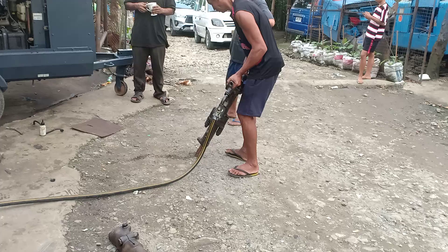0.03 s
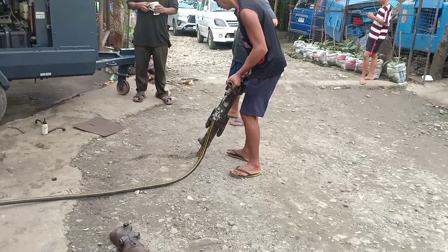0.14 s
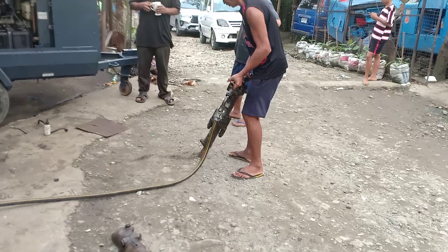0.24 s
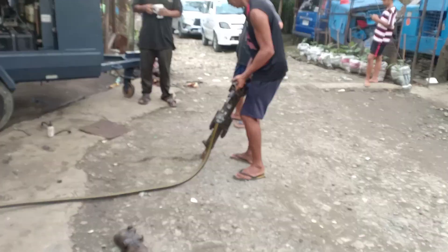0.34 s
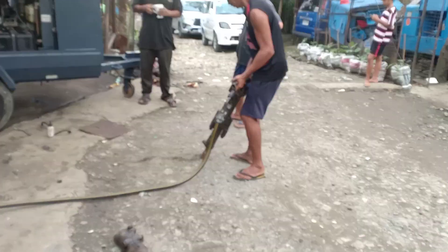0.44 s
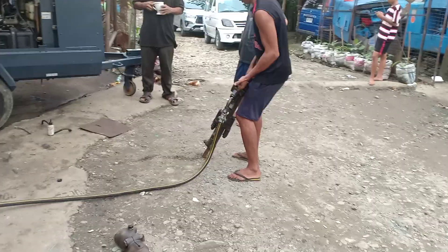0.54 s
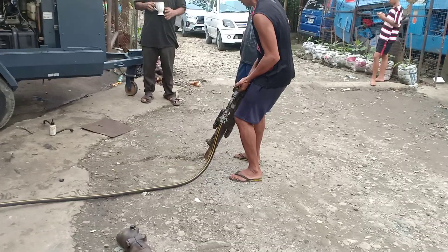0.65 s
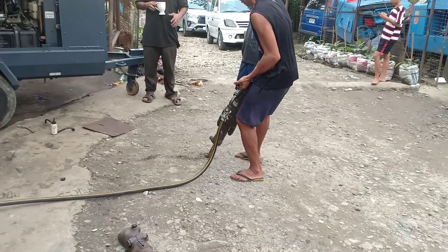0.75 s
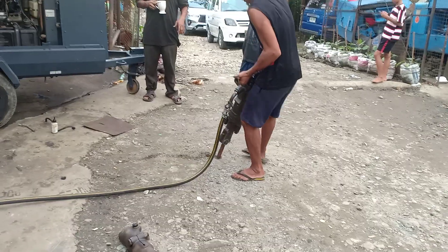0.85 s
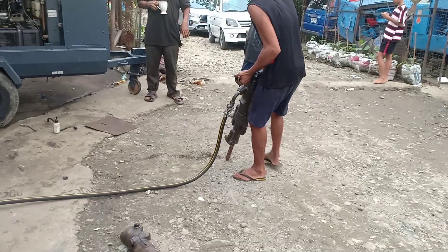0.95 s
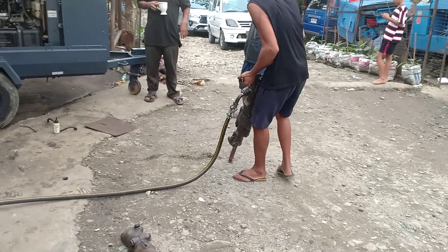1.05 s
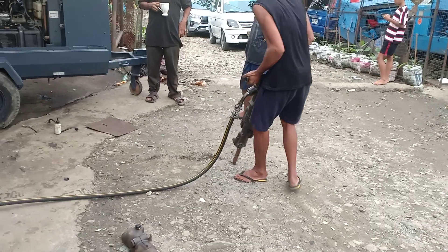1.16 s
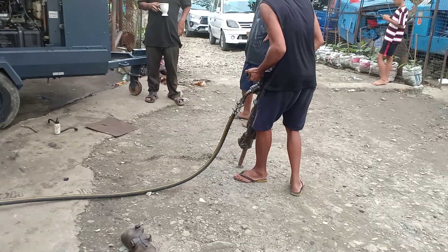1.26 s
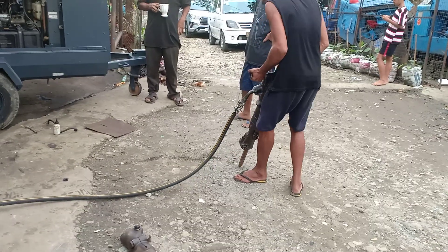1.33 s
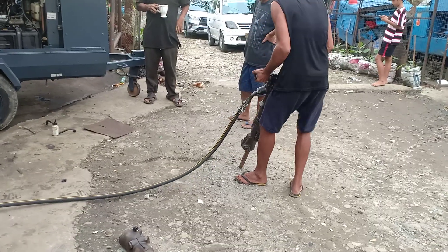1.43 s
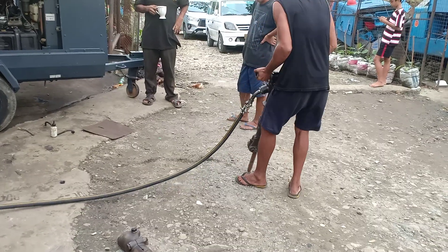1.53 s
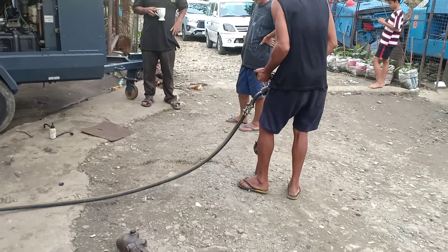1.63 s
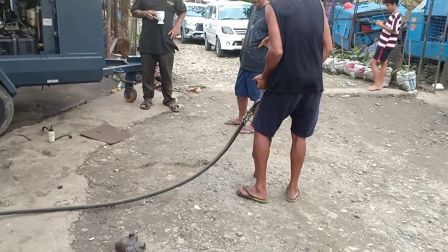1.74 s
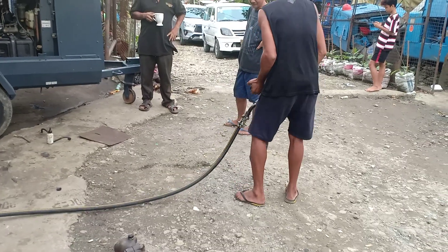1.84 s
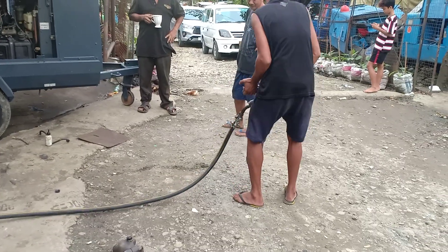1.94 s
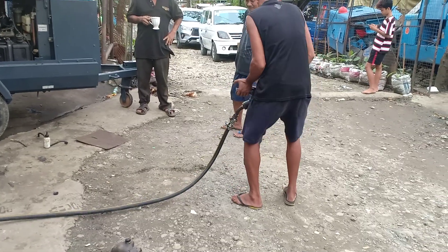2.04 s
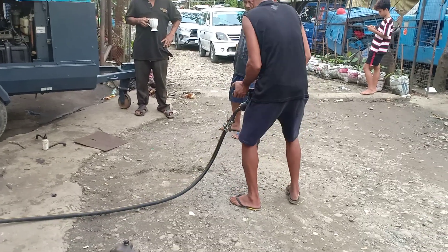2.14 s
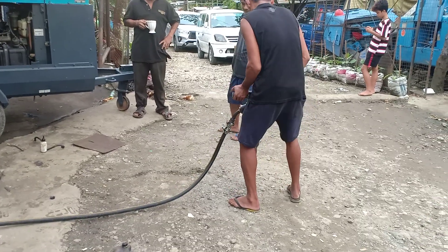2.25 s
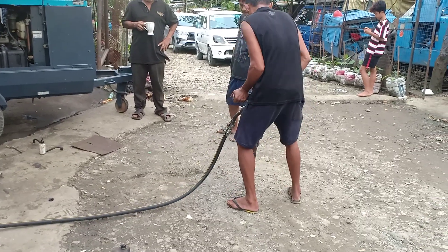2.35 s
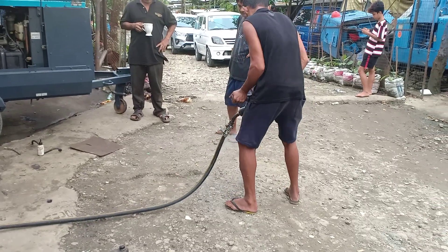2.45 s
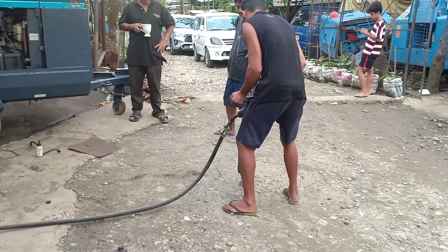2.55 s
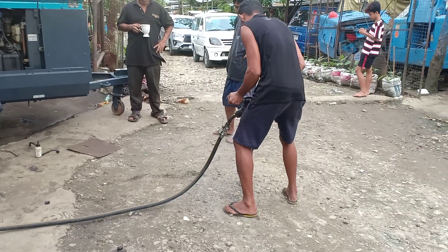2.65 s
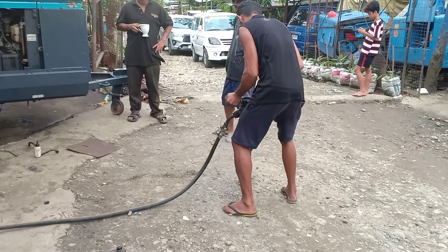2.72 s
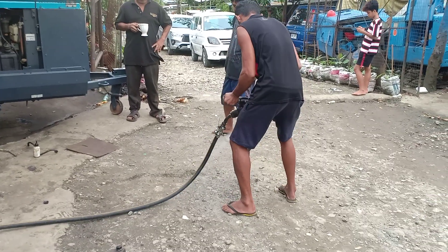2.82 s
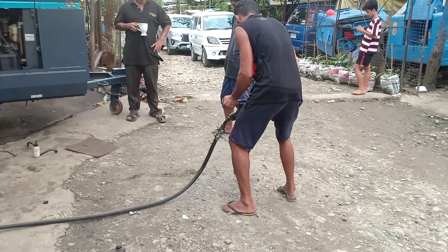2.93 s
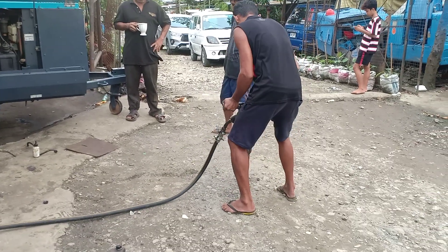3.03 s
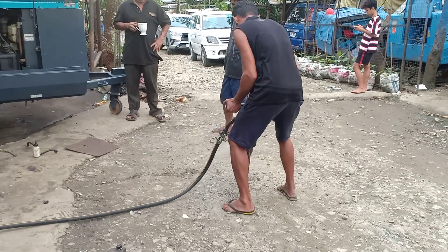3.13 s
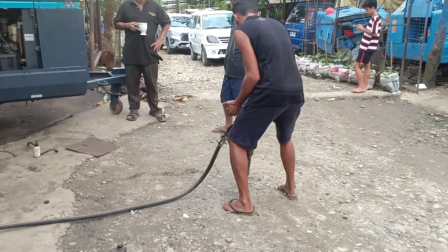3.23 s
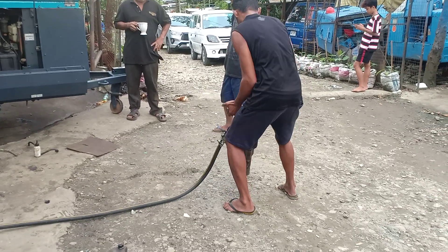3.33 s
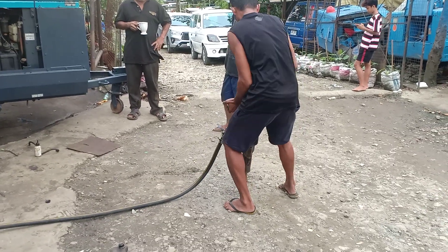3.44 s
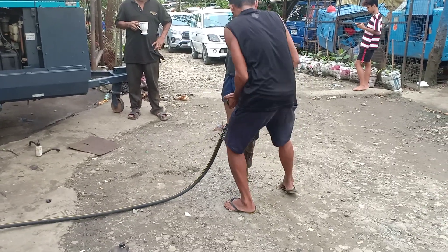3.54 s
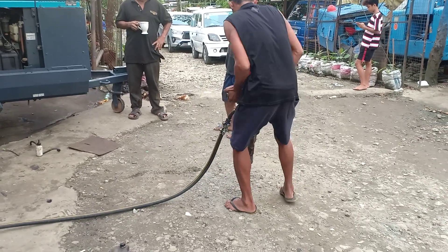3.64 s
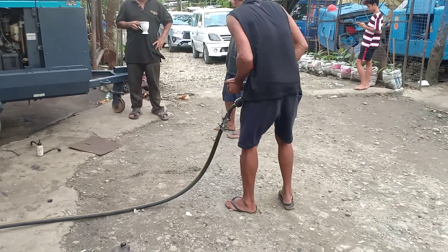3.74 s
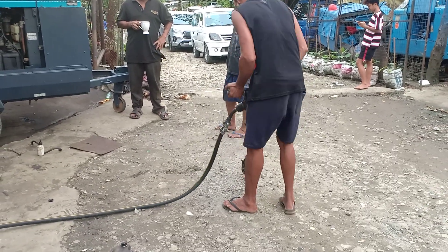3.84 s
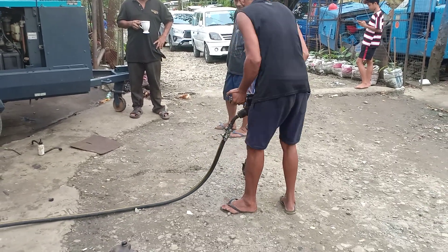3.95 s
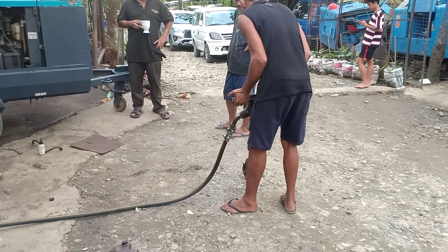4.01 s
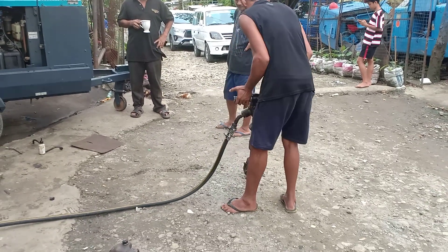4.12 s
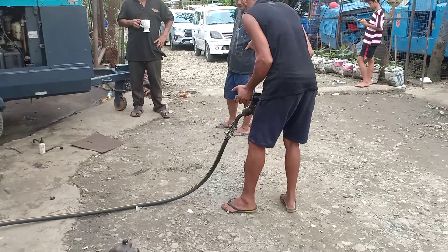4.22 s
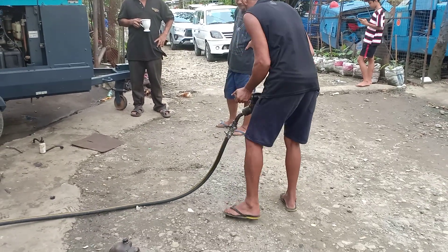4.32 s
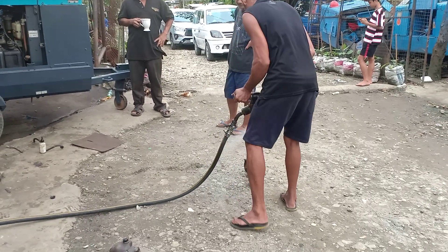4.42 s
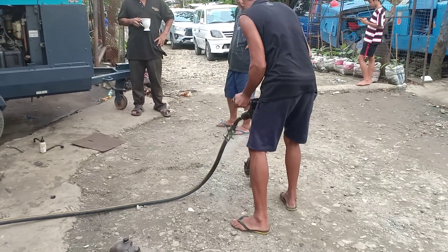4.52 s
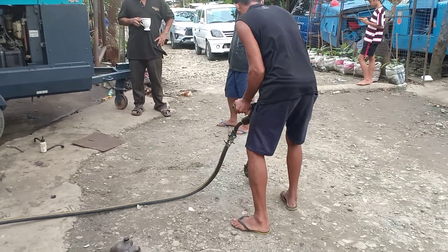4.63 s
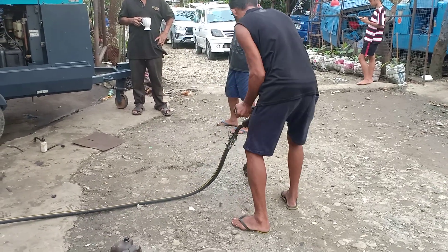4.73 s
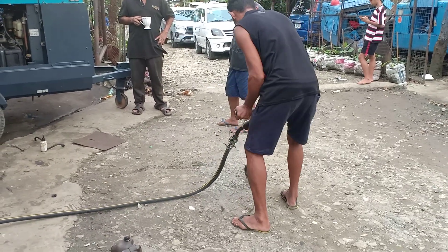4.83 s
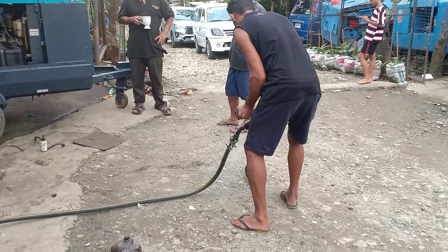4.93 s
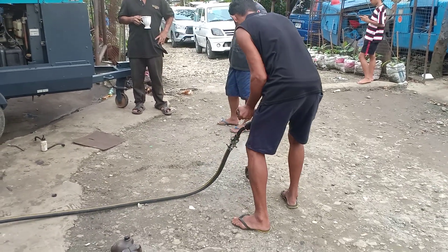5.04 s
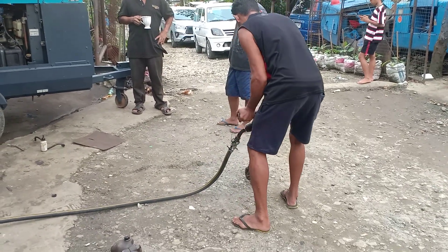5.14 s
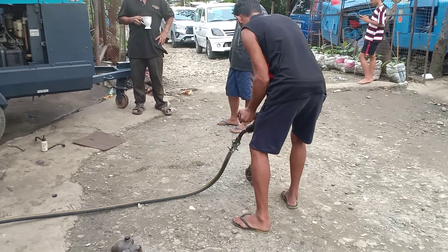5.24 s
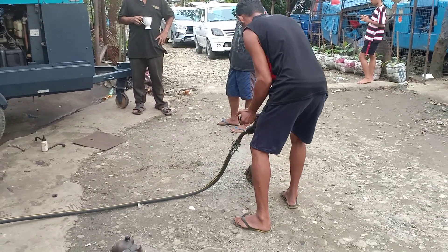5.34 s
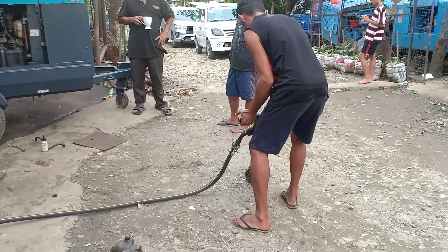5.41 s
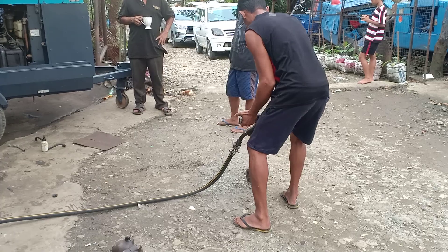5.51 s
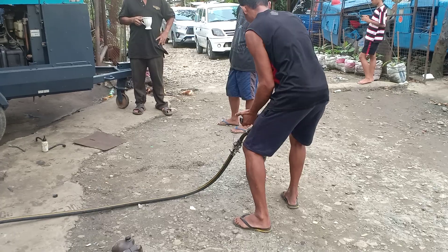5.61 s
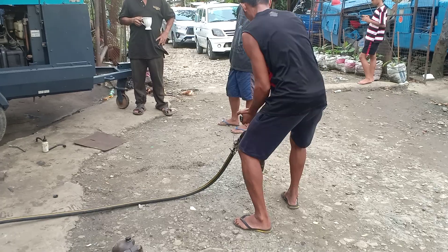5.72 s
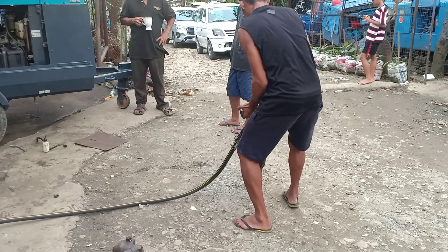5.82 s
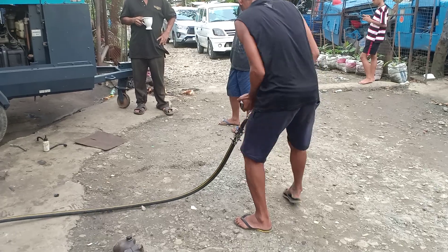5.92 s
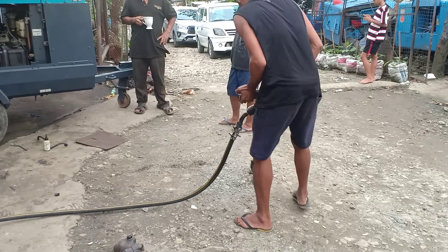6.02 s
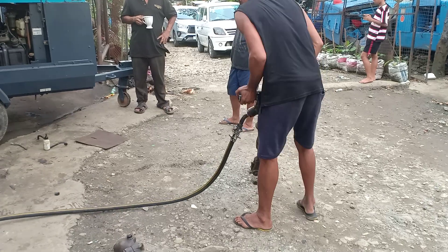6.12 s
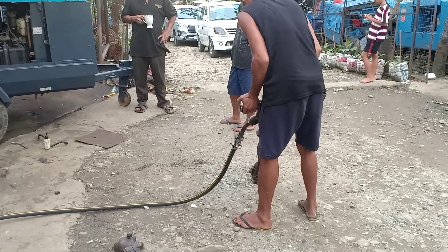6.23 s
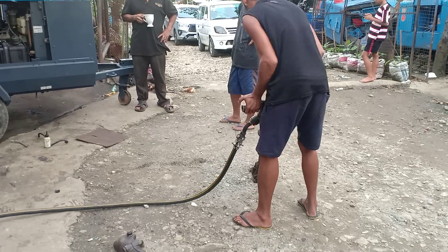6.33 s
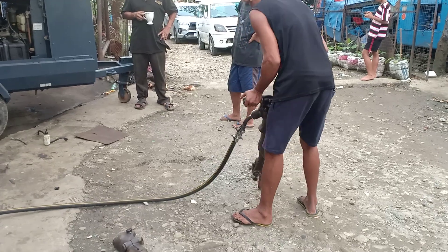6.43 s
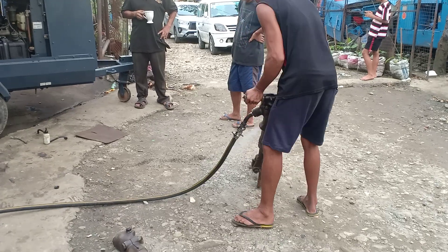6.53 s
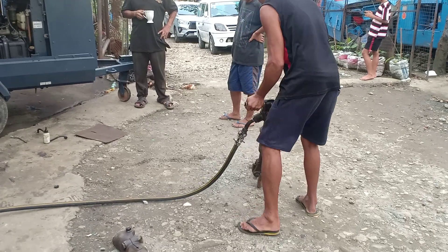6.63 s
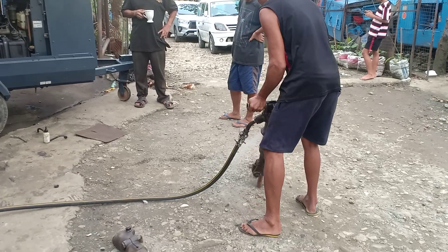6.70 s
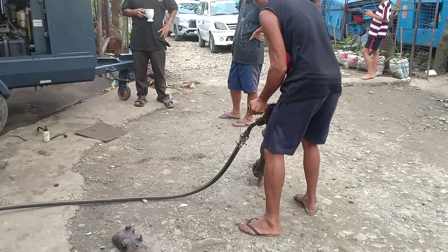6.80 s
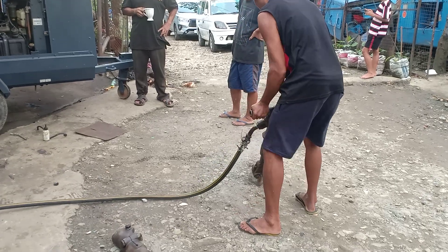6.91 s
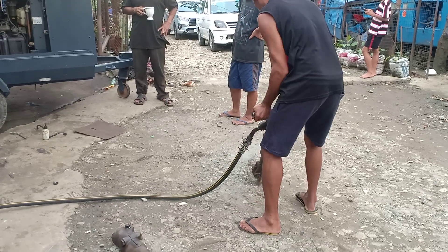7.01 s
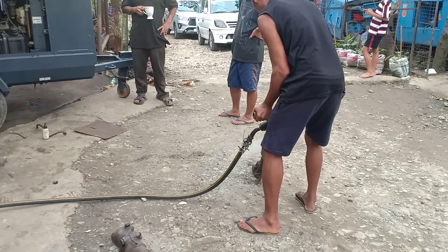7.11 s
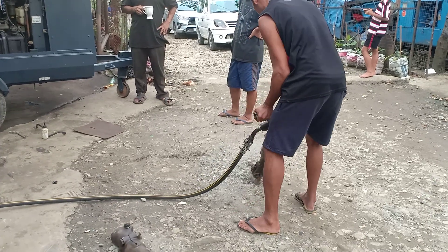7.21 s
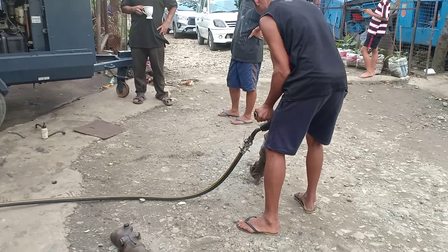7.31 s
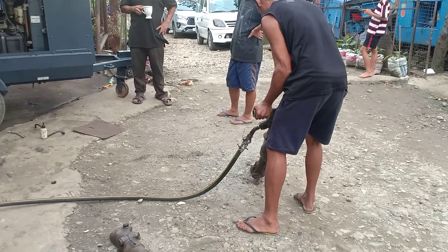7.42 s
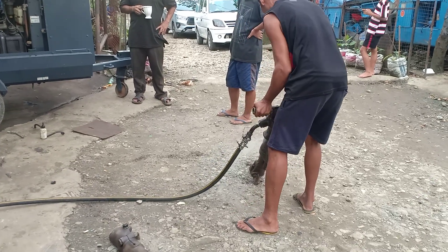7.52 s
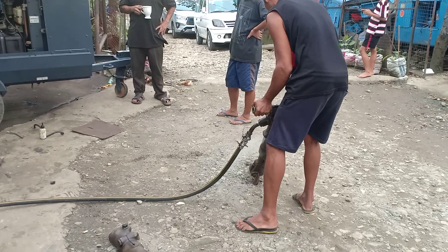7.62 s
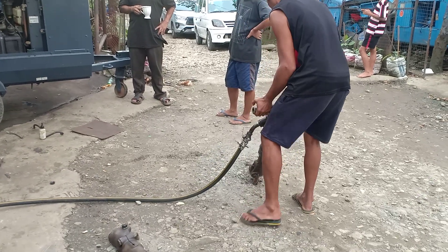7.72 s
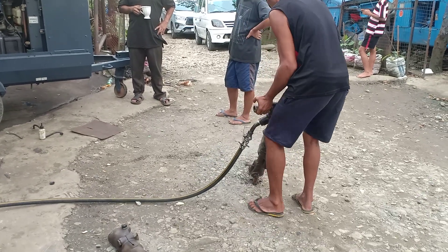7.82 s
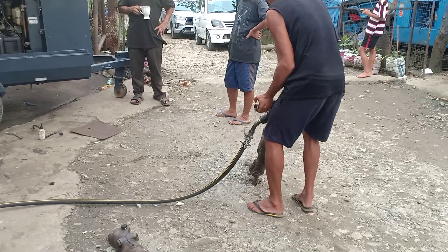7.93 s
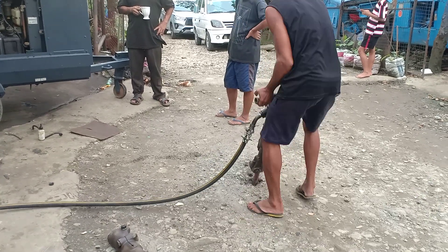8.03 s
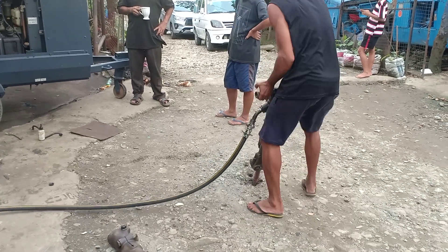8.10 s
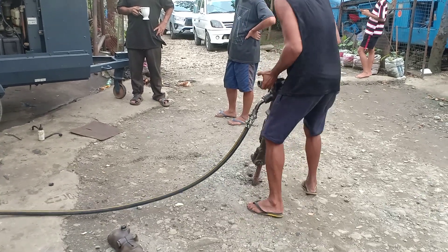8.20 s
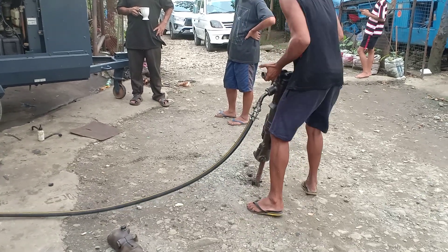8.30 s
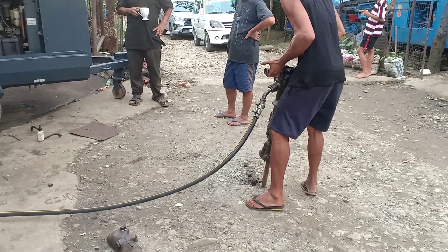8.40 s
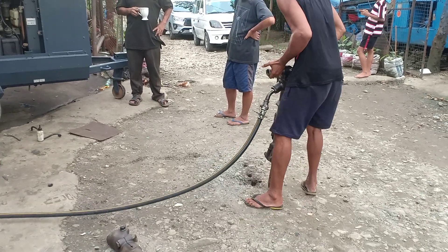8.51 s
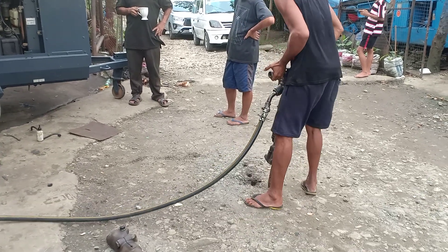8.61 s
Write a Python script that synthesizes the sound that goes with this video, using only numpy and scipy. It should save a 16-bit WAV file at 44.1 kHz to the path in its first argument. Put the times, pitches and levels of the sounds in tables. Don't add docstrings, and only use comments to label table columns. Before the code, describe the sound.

A jackhammer pounds gravelly ground in four short, fast bursts outdoors while a diesel compressor drones and hisses between them.

```python
import sys
import numpy as np
from scipy import signal
from scipy.fft import rfft, irfft, next_fast_len
from scipy.io import wavfile
from scipy.ndimage import uniform_filter1d, map_coordinates

SR = 44100
rng = np.random.default_rng(int(sys.argv[2]) if len(sys.argv) > 2 else 0)


def store_wav(level_fs):
    pcm = np.round(np.clip(np.atleast_2d(level_fs), -1, 1) * 32767)
    wavfile.write(sys.argv[1], SR, pcm.T.astype(np.int16))


def ratio_of_db(decibels):
    return 10 ** (np.asarray(decibels, float) / 20)


N = 381906
T = np.arange(N) / SR
M = next_fast_len(N)
HZ = np.maximum(np.fft.rfftfreq(M, 1 / SR), 1)


def rms_one(x):
    return x / np.sqrt(np.mean(x ** 2) + 1e-20)


def in_time(rows):
    s, *columns = np.transpose(rows)
    return [np.interp(T, s, c) for c in columns]


def at_hz(points):
    hz, value = np.array(points).T
    return np.interp(np.log(HZ), np.log(hz), value)


def drift(rate):
    knots = rng.standard_normal(2000)
    return map_coordinates(knots, [np.minimum(T * rate * 2, 1990)], order=3)


def resonance(x, hz, width):
    r = np.exp(-np.pi * width / SR)
    zeros = np.array([1, 0, -1]) * (1 - r * r) / 2
    poles = [1, -2 * r * np.cos(2 * np.pi * hz / SR), r * r]
    return signal.lfilter(zeros, poles, x + 1e-18)


def high_pass(x, hz):
    return signal.sosfilt(signal.butter(2, hz, "high", fs=SR, output="sos"), x)


def clicks(times, db):
    out = np.zeros(N)
    out[(np.asarray(times) * SR).astype(int)] = ratio_of_db(np.asarray(db))
    return out


def swell(x, rise_s, fall_s):
    for tau in (rise_s, fall_s):
        x = signal.lfilter([1], [1, -np.exp(-1 / (tau * SR))], x + 1e-18)
    return x / (rise_s * SR)


# frequency in Hz, likeness from 0 to 1.
PORT_LIKENESS = [(60, 0.69), (130, 1), (290, 0.9), (640, 0.93), (1410, 0.63), (3100, 0.31), (6820, 0.19),
                 (15000, .05)]


def noise(spectrum):
    mid, side = rfft(rng.standard_normal((2, M)))
    alike = np.clip(at_hz(PORT_LIKENESS), -1, 1)
    pair = np.sqrt(1 + alike) * mid + np.sqrt(1 - alike) * side * [[1], [-1]]
    return rms_one(irfft(pair * ratio_of_db(at_hz(spectrum)), M)[:, :N])


# time in seconds, firing rate in Hz, firing tone in dB, higher orders in dB.
ENGINE = [(0.08, 56.1, -62, -48), (0.4, 55.5, -45, -38), (1.1, 54.4, -42, -38.5), (1.7, 50, -48, -35.5),
          (1.85, 50.26, -54, -39.5), (2.4, 49.5, -50, -39), (3.25, 60.42, -52, -44), (3.68, 70, -43, -43),
          (3.95, 56, -44, -40.5), (4.25, 42.2, -63, -53), (4.95, 52.4, -56, -48), (5.55, 64, -58, -42),
          (5.86, 75.5, -38.5, -44), (6.25, 50, -53, -48), (6.45, 42, -70, -51), (7.7, 60.25, -56, -56),
          (8.08, 74.7, -42.5, -39.5), (8.66, 50.6, -54, -49)]
# multiple of the firing rate, level in dB.
ENGINE_ORDERS = [(2, -6), (2.5, -15), (3, -9), (4, -19), (5, -21)]
# frequency in Hz, density in dB per Hz.
CASING_RUMBLE = [(21, -48), (35, -37), (53, -59), (91, -4), (123, 2), (164, -7.5), (209, -6), (376, -14),
                 (451, -10), (648, 0), (891, -11), (1070, -15), (1300, -15.5), (1690, -26), (2860, -120)]
# frequency in Hz, density in dB per Hz.
AIR_LEAK = [(590, -69), (1000, -1.5), (1300, -1), (1570, -2), (2380, 0.5), (3480, -3.5), (4090, -2),
            (4380, -1.5), (5460, 2.5), (8470, -14), (9730, -13), (11400, -7.5), (12500, -12), (13800, -7.5),
            (15800, -14)]
# frequency in Hz, width in Hz, level in dB.
LEAK_WHISTLES = [(2320, 400, -5.5), (4053, 12, 1), (4740, 9, 4), (5190, 23, 0), (6030, 12, 2),
                 (11480, 290, -13), (13600, 210, -23)]
# time in seconds, hiss level in dB.
PHONE_GAIN = [(0.08, -53), (0.28, -51), (0.46, -43.5), (1.15, -39.5), (2.35, -35.5), (2.6, -41),
              (3.35, -46), (4.36, -42), (5.6, -48), (5.9, -46.5), (6.48, -45), (6.8, -49), (8.0, -49),
              (8.66, -46.5)]


def compressor(work):
    firing_hz, tone_db, orders_db = in_time(ENGINE)
    gain_db, = in_time(PHONE_GAIN)

    turn = 2 * np.pi * np.cumsum(uniform_filter1d(firing_hz, size=9000)) / SR
    firing = ratio_of_db(uniform_filter1d(tone_db, size=9000)) * np.sin(turn)
    orders = np.zeros(N)
    for k, db in ENGINE_ORDERS:
        level = ratio_of_db(db + orders_db + 1.3 * drift(5.5))
        orders += level * np.sin(k * turn + 0.12 * k * drift(7.5))

    idle_hz, idle_db, rise_db_per_hz = 50, 1.36, 0.2634
    idle = ratio_of_db(gain_db + idle_db + rise_db_per_hz * (firing_hz - idle_hz))
    shaken = work * ratio_of_db(-22)
    casing = noise(CASING_RUMBLE)
    upper = high_pass(casing, 380)
    rumble = upper * np.hypot(idle, shaken) + (casing - upper) * np.hypot(idle, shaken * ratio_of_db(-5))
    rumble = rumble * ratio_of_db(-1.0 + 0.9 * np.sin(turn) + 0.23 * drift(6))

    hiss_db = 20 * np.log10(np.hypot(ratio_of_db(gain_db), work * ratio_of_db(-38.5)))
    white = rng.standard_normal((2, N))
    whistles = rms_one(sum(ratio_of_db(db) * resonance(white, hz, width) for hz, width, db in LEAK_WHISTLES))
    hiss = (noise(AIR_LEAK) + ratio_of_db(-7) * whistles) * ratio_of_db(hiss_db + 8.0 + 0.35 * drift(15))
    return np.sqrt(2) * (firing + orders + fan_whine()) + rumble + hiss


# first blow in seconds, last blow in seconds,
# first pop in dB, last pop in dB, air blast in dB at a 0 dB pop.
STEADY_RUNS = [
    (0.127, 0.325, -19, -4, -6.5),
    (2.577, 2.943, -3, -4.5, -11),
    (3.005, 3.249, -6.5, -8.5, -11.5),
    (4.604, 4.786, -5, -6.5, -10),
    (4.845, 5.481, -9, -13, -9.5),
    (6.709, 6.886, -5.5, -9.5, -11.5),
    (6.945, 7.394, -10, -8.5, -13),
    (7.452, 7.793, -9, -11.5, -10.5),
]
# time in seconds, muffler pop in dB,
# air blast in dB, return pop in dB relative to the first.
UNEVEN_STROKES = [(0.393, -6.5, -15.5, -7.5), (0.47, -15.5, -35, -22), (0.544, -27.5, -40, -13),
                  (2.363, -17, -46, -18), (2.405, -6.5, -53, -25), (2.456, -1.5, -12, -9),
                  (2.518, -0.5, -18, -5), (3.306, -11.5, -28.5, -13), (3.38, -26, -49, -10),
                  (4.399, -19, -31, -13), (4.437, -10.5, -42, 0), (4.494, -3, -12.5, -10),
                  (4.555, -5.5, -14.5, -4), (5.54, -14, -27, -9), (5.61, -21, -42, -20),
                  (5.675, -30, -44, -17), (6.502, -24.5, -53, -20), (6.542, -15, -41, -12),
                  (6.598, -6.5, -13.5, -8), (6.657, -3, -16, -8.5), (7.855, -12.5, -28, -6),
                  (7.918, -14.5, -29, -2), (7.987, -14.5, -29, -5), (8.062, -16.5, -33.5, -3),
                  (8.144, -19, -38, -25), (8.21, -27, -44, -19)]


def cycles():
    rows = list(UNEVEN_STROKES)
    usual_gap_s = .059
    spreads = [.0004, .8, 1.0, 2.5]
    for first_s, last_s, first_db, last_db, air_db in STEADY_RUNS:
        count = round((last_s - first_s) / usual_gap_s) + 1
        chance = rng.standard_normal((count, 4)) * spreads
        s = np.linspace(first_s, last_s, count)
        pop_db = np.linspace(first_db, last_db, count)
        blast_db = air_db + 0.76 * pop_db
        back_db = -11.5 - 0.39 * pop_db
        rows += list(map(tuple, np.transpose([s, pop_db, blast_db, back_db]) + chance))
    s, pop_db, blast_db, back_db = np.transpose(sorted(rows))
    pop_share = 0.58
    thump_db = -10.5 + pop_share * pop_db + (1 - pop_share) * blast_db
    return np.transpose([s, pop_db, blast_db, thump_db, back_db])


def strokes(cycle):
    s = cycle[:, 0]
    gap = np.clip(np.diff(s, append=s[-1] + 0.032), .03, .085)
    share, lead_s = .65, .011
    return s + share * gap - lead_s + 0.00069 * rng.standard_normal(len(s))


def effort(cycle):
    s, pop_db = cycle[:, 0], cycle[:, 1]
    since = T - s[np.maximum(np.searchsorted(s, T) - 1, 0)]
    working = ratio_of_db(np.interp(T, s, pop_db)) * (np.abs(since) < .09)
    settle_s = 0.17
    return uniform_filter1d(working, size=int(settle_s * SR))


# burst start in seconds, muffler pitch in Hz, near echo delay in seconds,
# near echo in dB, far echo delay in seconds, far echo in dB.
STANCES = [
    (0.1, 840, .0062, -13, .0135, -9),
    (2.35, 745, .0054, -14, .0175, -11),
    (4.38, 800, .0049, -12, .0135, -10),
    (6.49, 830, .0036, -10, .0125, -7),
]


def muffler(cycle, back_s):
    s, pop_db, _, _, back_db = cycle.T
    start_s, muffler_hz = np.transpose(STANCES)[:2]
    stance = np.searchsorted(start_s, s) - 1
    pop_hz = muffler_hz[stance] * (1 + .025 * rng.standard_normal(len(s)))
    flat, recovery_s = 0.065, 0.22
    pop_hz = pop_hz * (1 - flat * np.exp((start_s[stance] - s) / recovery_s))

    pops, t = np.zeros(N), np.arange(1300) / SR
    shape = np.exp(-((t - .0042) / .0020) ** 2)
    climbing = t + 14 * (t - .0042) ** 2
    all_s = np.r_[s, back_s]
    all_db = np.r_[pop_db, pop_db + back_db]
    all_hz = np.r_[pop_hz, .97 * pop_hz]
    for at, db, hz in zip(all_s, all_db, all_hz):
        i = int((at - .0024) * SR)
        pops[i:i + len(t)] -= ratio_of_db(db - 4.0) * shape * np.sin(2 * np.pi * hz * climbing)

    mutter = rms_one(resonance(resonance(rng.standard_normal(N), 570, 630), 730, 570))
    mutter = mutter * swell(clicks(s + 0.0031, pop_db - 21.0), 0.0078, 0.011)
    return pops + 2 * housing(pops) + mutter


def stance_spans():
    ends = [int(row[0] * SR) for row in STANCES] + [N]
    return list(zip(ends, ends[1:]))


# frequency in Hz, width in Hz, level in dB.
HOUSING_MODES = [
    (880, 45, -17),
    (727, 21, -7),
    (829, 50, -19.5),
    (822, 69, -14),
]


def housing(pops):
    out = np.zeros(N)
    for (hz, width, db), (a, b) in zip(HOUSING_MODES, stance_spans()):
        burst = np.zeros(N)
        burst[a:b] = pops[a:b]
        out += ratio_of_db(db) * resonance(burst, hz, width)
    return out


# time in seconds, peak in dB, ground thump in dB.
LOOSE_STRIKES = [(2.392, -2.5, -46), (2.44, -2, -22), (4.4114, -12.5, -64), (4.4703, -3, -20),
                 (6.527, -12.5, -58), (6.5792, -4, -25)]
# frequency in Hz, density in dB per Hz.
AIR_BLAST = [(680, -6), (1150, -6), (1210, -2), (1600, -1.5), (1820, 8), (2790, 5), (3080, -1), (3760, 1.5),
             (5960, 0.5), (6570, -8.5), (7660, -14.5), (9650, -20.5), (11500, -13.5), (15000, -24.5),
             (15800, -14)]
# frequency in Hz, width in Hz, level in dB.
STEEL_MODES = [(1214, 180, -6), (1770, 47, -6), (2195, 120, -2), (2820, 120, 0), (3800, 67, -1.5),
               (4240, 150, -2.5), (4760, 59, -4), (5870, 38, 2)]
# frequency in Hz, width in Hz, level in dB.
GROUND_MODES = [(106.5, 174, 6.5), (180, 65, -1), (264.6, 75, 5.5), (486, 43, -16)]


def blows(cycle, back_s):
    s, pop_db, blast_db, thump_db, back_db = cycle.T
    loose_s, loose_db, loose_thump_db = np.transpose(LOOSE_STRIKES)
    hit_s = np.r_[s + .0062, loose_s]
    hit_db = np.r_[blast_db + 3, loose_db - 8]

    burst = swell(clicks(hit_s, hit_db), 0.0023, 0.007)
    burst = burst + swell(clicks(back_s + 0.004, blast_db + 0.13 * back_db - 9.5), 0.0007, 0.02)
    burst = burst + swell(clicks(s - .0005, pop_db - 16), 0.00069, 0.0052)
    late, size = rng.random((len(hit_s), 2)).T
    bounce_s = hit_s + 0.0064 + late * (0.034 - 0.0064)
    bounce_db = hit_db - 7 + 3 * (2 * size - 1)
    burst = burst + swell(clicks(bounce_s, bounce_db), 0.00043, 0.0023)
    gusty = burst * ratio_of_db(1.8 * drift(130))
    air = noise(AIR_BLAST) * gusty

    rattle = rng.standard_normal((2, N)) + 0.93 * rng.standard_normal(N)
    rattle = rattle * gusty + clicks(hit_s + .0021, hit_db - 7.0)
    steel = np.zeros((2, N))
    for hz, width, db in STEEL_MODES:
        strength_db = 4 * drift(10) - 2
        steel += ratio_of_db(db + strength_db) * resonance(rattle, hz, width) / np.sqrt(width)

    t = np.arange(-200, 201) / SR / 0.0011
    kick = t * np.exp(.5 - t ** 2 / 2)
    push = clicks(hit_s - .0011, np.r_[thump_db, loose_thump_db] - 5.0)
    push = push + clicks(back_s + 0.00572, thump_db - 11.5)
    push = signal.fftconvolve(push, kick)[:N]
    rings = sum(ratio_of_db(db) * resonance(push, hz, width) for hz, width, db in GROUND_MODES)
    knock = resonance(resonance(clicks(hit_s - .0006, hit_db + 31.5), 470, 546), 1305, 400)
    return air + ratio_of_db(24.0) * steel, high_pass(push + ratio_of_db(-1) * rings, 85) + knock


def yard_echoes(x, scatter_db):
    size = 9000
    out, t = np.zeros((2, N + size)), np.arange(size) / SR
    for (_, _, near_s, near_db, far_s, far_db), (a, b) in zip(STANCES, stance_spans()):
        own = resonance(rng.standard_normal((2, size)), 870, 910)
        scatter = resonance(rng.standard_normal(size), 630, 2300) + 2.36 * own
        paths = scatter * ratio_of_db(scatter_db - 60 * t / 0.14) * (t > .003)
        paths[:, 0] = 1
        paths[:, int(near_s * SR)] += ratio_of_db(near_db)
        paths[:, int(far_s * SR)] += ratio_of_db(far_db)
        out[:, a:b + size - 1] += signal.fftconvolve(x[:, a:b], paths, axes=1)
    return out[:, :N]


# frequency in Hz, then level in dB in bursts 1,
# 2, 3 and 4.
BURST_COLOUR = [(70, 1, 0, 0, -0.5), (113, -1, 2.5, 4.5, 3), (169, -2.5, -4.5, -5, -0.5),
                (246, 2.5, 2, 0.2, -0.2), (330, -5, 4.5, 4, -4.5), (403, 3.5, 5.5, 3.5, 10),
                (580, 6, 2, 12, 6.5), (634, 7.5, -0.8, 1.5, 8.5), (786, 5.5, 0.7, 2.7, 3.5),
                (845, 0, 3.5, 2.8, -3.5), (990, 8, 8.5, 3.5, 0.5), (1250, -5, -0.5, 2, 2),
                (1810, -6.5, 0.5, -1, 0.7), (3160, -4, -2.1, -1.7, -2)]


def coloured(x):
    out, table = np.zeros((2, N)), np.array(BURST_COLOUR)
    for k, (a, b) in enumerate(stance_spans()):
        size = next_fast_len(b - a)
        hz = np.fft.rfftfreq(size, 1 / SR) + 1
        gain = ratio_of_db(np.interp(np.log(hz), np.log(table[:, 0]), table[:, k + 1]))
        out[:, a:b] = irfft(rfft(x[:, a:b], size) * gain, size)[:, :b - a]
    return out


# start in seconds, end in seconds, start pitch in Hz,
# end pitch in Hz, level in dB.
FAN_GLIDES = [
    (1.35, 2.5, 306, 283.7, -48),
    (5.153, 5.549, 363, 380, -53),
    (6.883, 7.873, 368, 373, -54),
]


def fan_whine():
    out = np.zeros(N)
    swell_s, fade_s, off_db = .3, 0.16, 37
    for start_s, end_s, start_hz, end_hz, db in FAN_GLIDES:
        hz = np.interp(T, [start_s, end_s], [start_hz, end_hz])
        edge = np.minimum((T - start_s) / swell_s, (end_s - T) / fade_s)
        level = ratio_of_db(db + off_db * (np.clip(edge, -3, 1) - 1) / 2)
        out += level * np.sin(2 * np.pi * np.cumsum(hz) / SR)
    return out


def scene():
    cycle = cycles()
    back_s = strokes(cycle)
    blast, thump = blows(cycle, back_s)
    hammer = muffler(cycle, back_s) + thump + blast
    return coloured(yard_echoes(hammer, scatter_db=-38)) + compressor(effort(cycle))


def band_limit(x):
    return signal.sosfilt(signal.butter(12, 16670, fs=SR, output="sos"), x)


# frequency in Hz, left minus right in dB.
PORT_SHADE = [(40, 2), (110, -0.9), (200, -1), (380, -0.5), (700, -1), (1290, 3.5), (2380, 5.5), (4400, 16),
              (8120, 16), (15000, 18)]
# frequency in Hz, lead of the left port in radians.
PORT_LEAD = [(0, 0), (1030, 0.1), (1460, 1.3), (1810, 2), (2760, 0.73), (3270, 0.5), (4050, 0.7),
             (5170, -2), (5940, 2), (7150, 5.5), (9560, -30.5), (10100, -16), (12700, -9.5), (16300, -16)]


def record(dry):
    shade = ratio_of_db(-at_hz(PORT_SHADE))
    left = 2 / (1 + shade) / np.sqrt(1 + (46 / HZ) ** 12)
    right = left * shade * np.exp(-1j * at_hz(PORT_LEAD))
    ports = irfft(rfft(dry, M) * [left, right], M)
    top = [HZ < 15560, HZ < 14600]
    start_s = .079
    ports = irfft(rfft(np.tanh(ports)) * top, M)[:, :N] * (T > start_s)
    return band_limit(ports)


dry = scene()
out = record(dry)
store_wav(out)
```